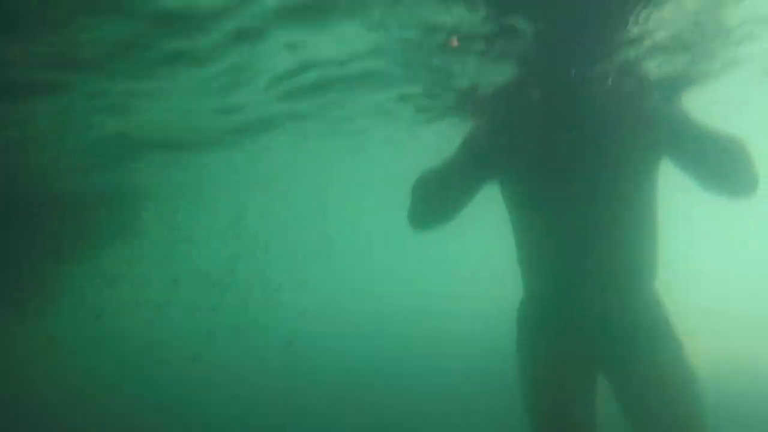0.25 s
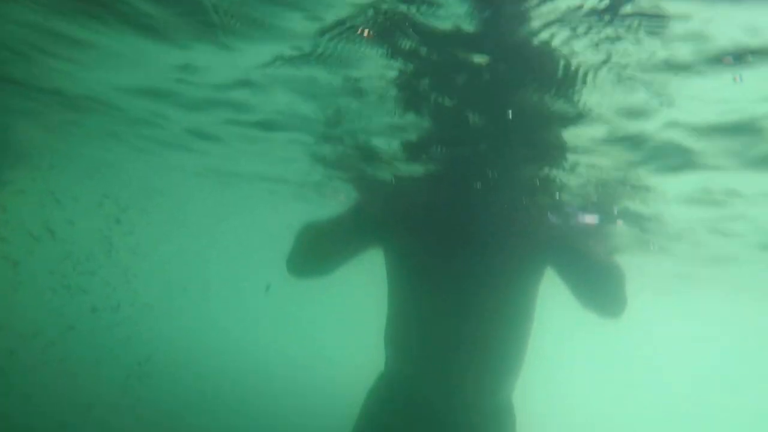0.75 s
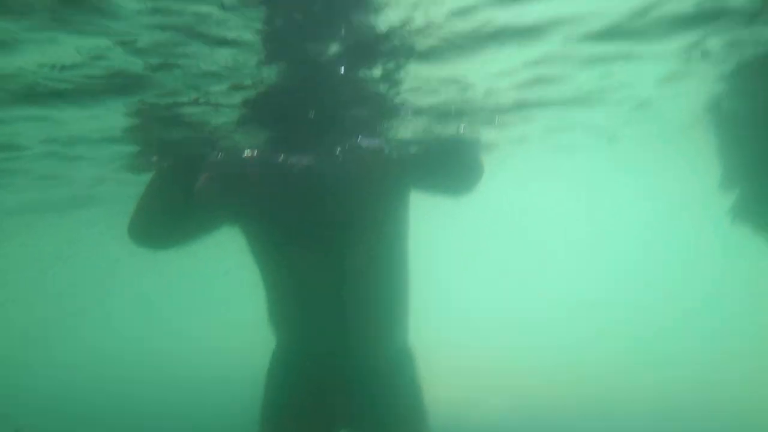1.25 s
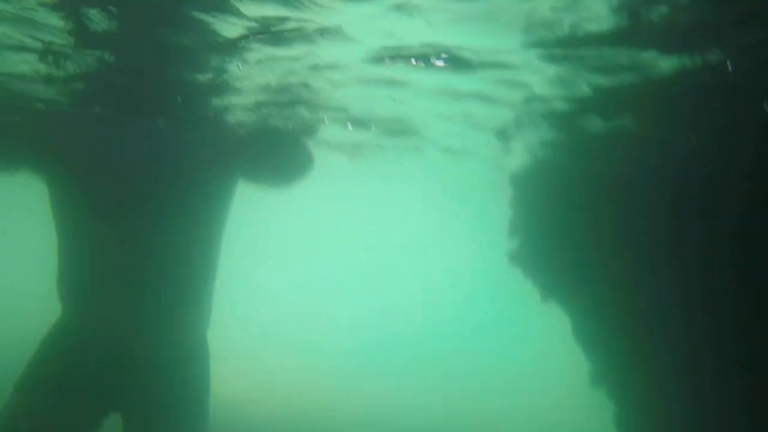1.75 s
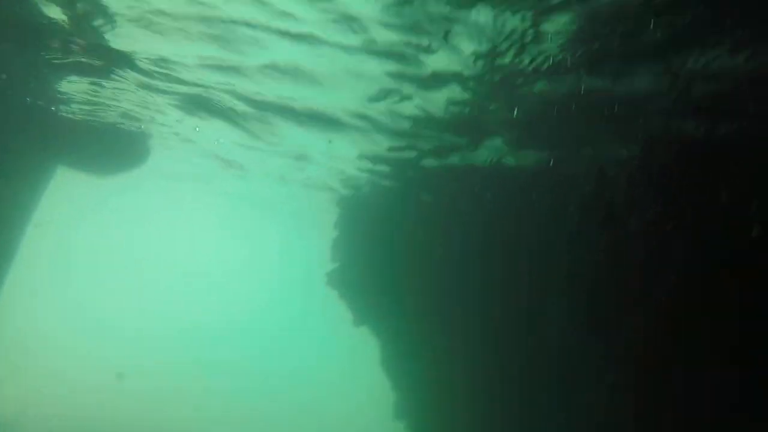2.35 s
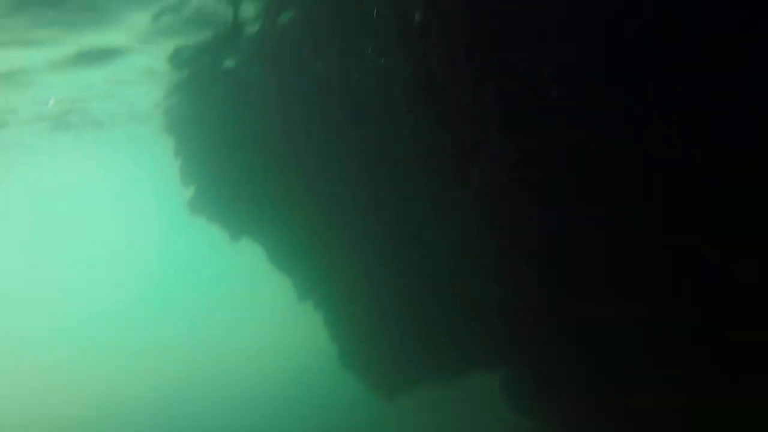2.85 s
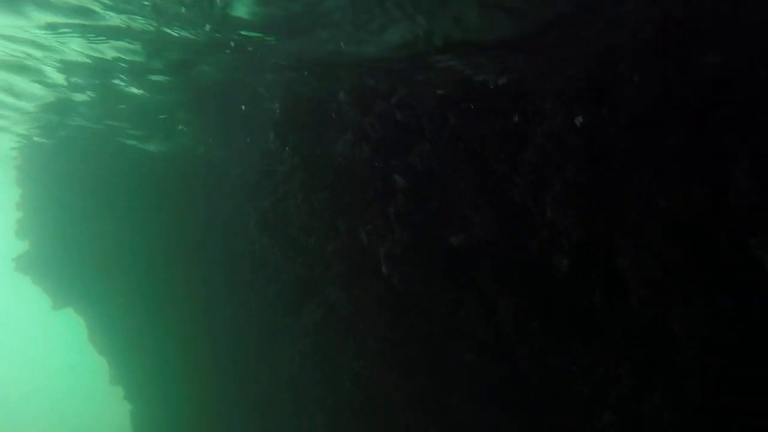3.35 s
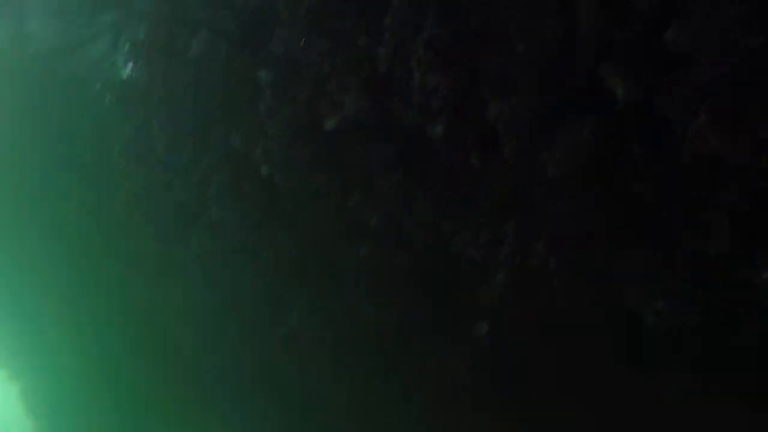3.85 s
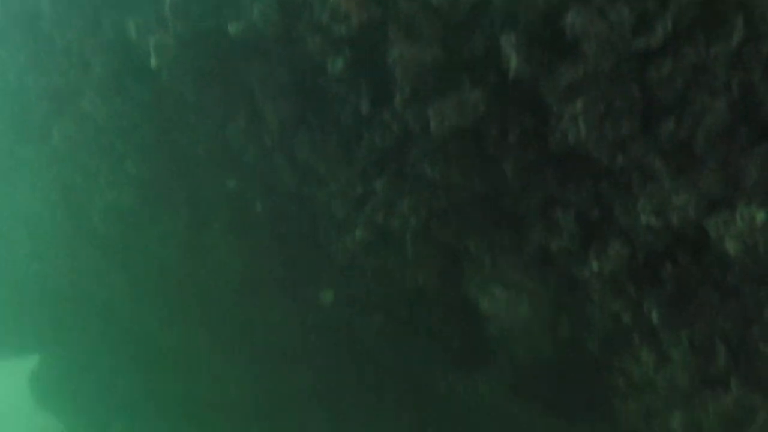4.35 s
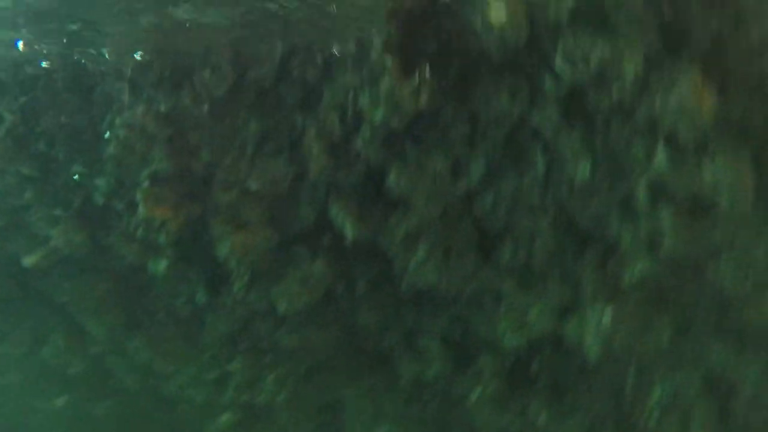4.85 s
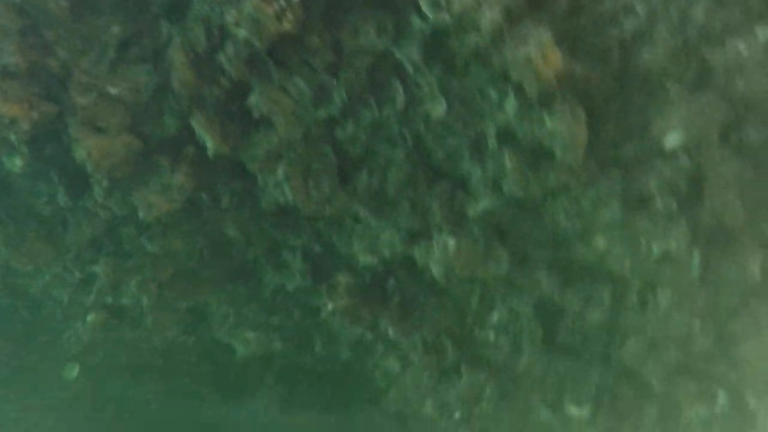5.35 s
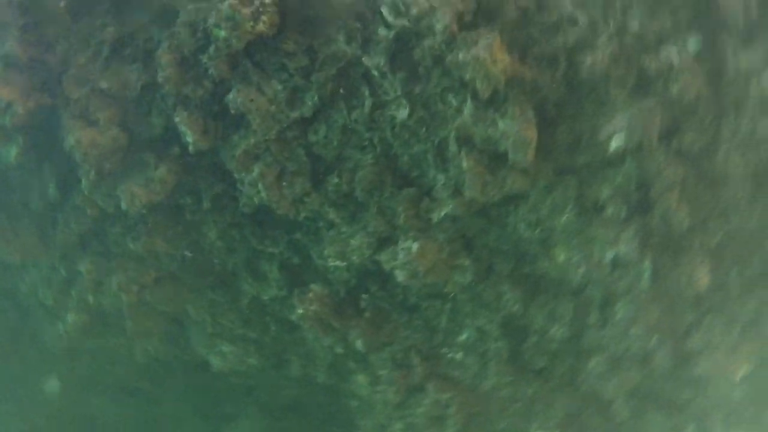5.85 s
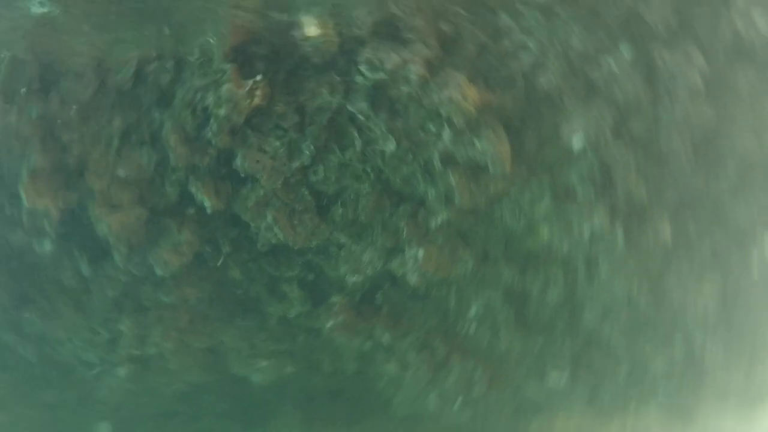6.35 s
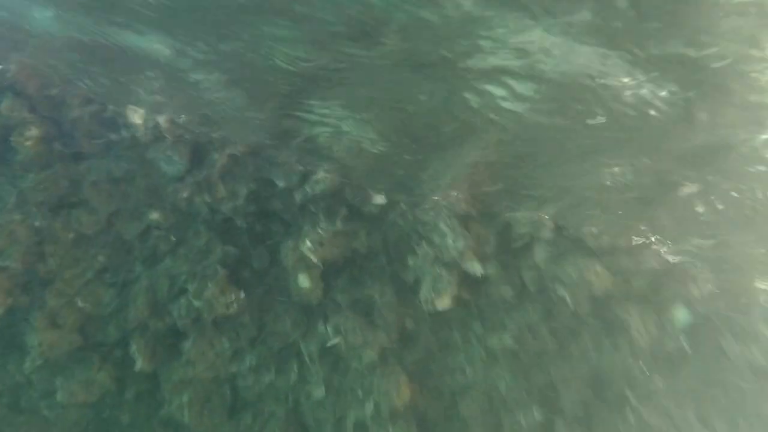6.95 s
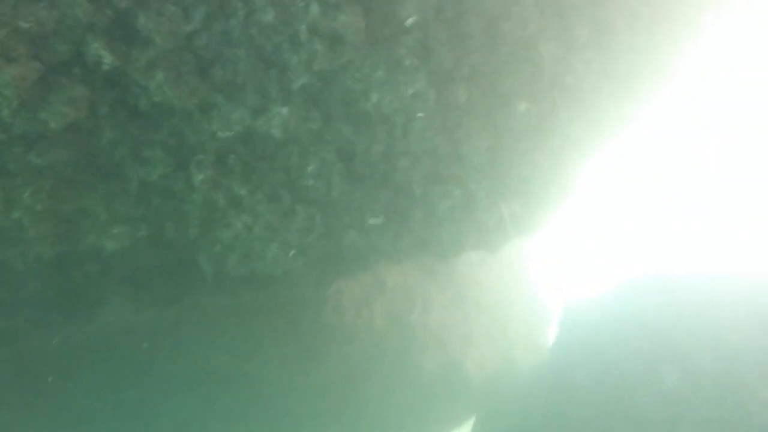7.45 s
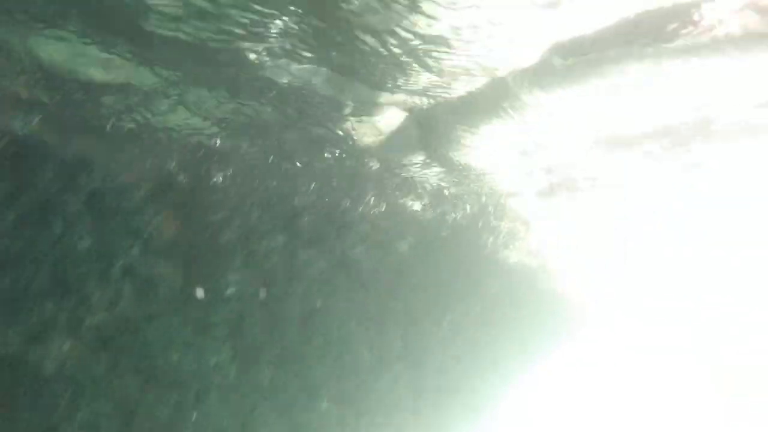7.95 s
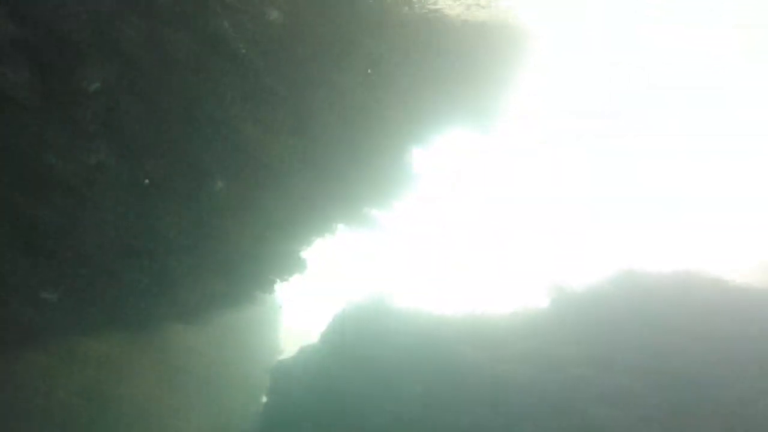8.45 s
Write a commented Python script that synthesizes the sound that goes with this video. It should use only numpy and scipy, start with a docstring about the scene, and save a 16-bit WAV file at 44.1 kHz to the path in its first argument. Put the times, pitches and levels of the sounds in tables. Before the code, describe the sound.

Under shallow sea water beside a rock, a soft steady wash surrounds the microphone. A boat engine hums on an almost constant low pitch near 200 Hz, faint and fluttering at first, with a small slosh and glug at the start and a few bubbles at 1.1-1.5 s. Around 1.6 s the thin sound gains bass. From 2.5 to 3.1 s a thick run of hollow bubbles gurgles with short low booms; one boom thumps near 3.4 s. Flow rumble rises from about 3 s, then eases. Tiny bright shrimp snaps tick throughout, sharpest near 4.0, 4.3 and 7.15 s, over faint crackle. Another slosh comes near 4.7 s. The engine strengthens clearly from 4.4 s, gaining buzzy overtones after 5.3 s. More round glugs come at 6.2-6.7 s. The drone peaks near 7 s, dips briefly around 7.5 s, then returns full and throbbing, with rumble and a last slosh until 8.7 s.

```python
"""A boat engine drones through shallow sea water and grows louder, heard under water beside a rock.
The engine is a set of sine orders locked to one shaft, each with its own level and waver.
Small waves slosh and gurgle as swarms of ringing bubbles over noise; booms are stirred low tones.
Snapping shrimp are short filtered noise bursts that tick against the microphone's housing.
Filtered noise gives the rumble of flow and the steady wash of distant water."""
import sys
import numpy as np
from scipy import signal
from scipy.fft import rfft, irfft
from scipy.io import wavfile
from scipy.ndimage import map_coordinates

SR = 44100
rng = np.random.default_rng(int(sys.argv[2]) if len(sys.argv) > 2 else 0)


def master(y):
    """Save y as 16-bit WAV."""
    cut = np.clip(np.atleast_2d(y).T, -1, 1)
    pcm = np.round(cut * 32767)  # scale
    wavfile.write(sys.argv[1], SR, pcm.astype(np.int16))


N = 384111
TIME = np.arange(N) / SR


def amp(db):
    """Decibels to gain."""
    return 10 ** (np.asarray(db) / 20)


def unit(x):
    """Scale to an rms of one."""
    return x / np.sqrt(np.mean(x ** 2) + 1e-20)


def curve(rows):
    """Second column of a table, interpolated over the times in the first."""
    rows = np.array(rows)
    return np.interp(TIME, rows[:, 0], rows[:, 1])


def colour(x, points):
    """Filter by a spectrum of (Hz, dB) points joined on a log-frequency axis."""
    hz, db = np.transpose(points)
    f = np.fft.rfftfreq(len(x), 1 / SR)
    gain = amp(np.interp(np.log(f + 1), np.log(hz), db))
    return irfft(rfft(x) * gain, len(x))


def drift(per_s):
    """Smooth random signal of unit rms, with per_s random knots a second."""
    knots = rng.standard_normal(4096)
    return unit(map_coordinates(knots, [TIME * per_s], order=2, mode="wrap"))


def add(mix, start_s, sound):
    """Mix a sound in, in place, from start_s."""
    part = mix[max(round(start_s * SR), 0):][:len(sound)]
    part += sound[:len(part)]


def sparse(per_s, spread_db):
    """Random impulses of either sign, most of them small and a few large."""
    size = amp(spread_db * np.minimum(rng.exponential(1, N), 4))
    sign = rng.choice([-1, 1], N)
    return size * sign * (rng.random(N) < per_s / SR)


def swell(crest_s, level_db, rise_s, fall_s):
    """Power of a surge that builds up to its crest and ebbs away, Gaussian on each side."""
    width_s = np.where(TIME < crest_s, rise_s, fall_s)
    return amp(level_db) ** 2 * np.exp(-((TIME - crest_s) / width_s) ** 2)


def engine(jitter_rad=0.046, throb_depth=0.2):
    """Engine orders, all locked to one shaft whose phase jitters slightly."""
    # firing rate: [time_s, rate_hz]
    speed = [(0, 105), (.7, 103.2), (1.3, 103.7), (2.1, 102.1), (2.65, 106.1), (3.4, 102.8), (3.8, 103.5),
             (4.3, 103.2), (4.75, 102.2), (5.3, 102.8), (5.8, 103.4), (6.3, 103.5), (6.8, 104.3),
             (7.25, 105), (8, 104.3), (8.3, 104.4), (8.71, 104.7)]
    # level of the firing note: [time_s, level_db]
    firing = [(0, -78), (1.5, -58), (2, -51.5), (3, -51), (5, -65), (5.8, -53.5), (7.25, -54.5),
              (7.55, -39), (8.15, -35), (8.4, -36.5), (8.71, -33.5)]
    # paths off bottom and surface add and cancel, so orders 3 and 4 fade on their own: [time_s, level_db]
    third = [(0, -64), (.5, -50), (1.35, -48.5), (1.95, -61), (2.5, -46.5), (3.1, -47), (4.25, -53.5),
             (5.65, -52.5), (7, -44.5), (7.75, -48.5), (8.71, -43)]
    fourth = [(0, -63), (5.3, -68), (5.85, -51.5), (6.7, -48), (7.6, -53.5), (8, -60), (8.45, -40.5),
              (8.71, -42.5)]
    # reference level of the other overtones as the boat nears: [time_s, level_db]
    nearness = [(0, -53.5), (4, -61.5), (5.4, -48.5), (5.95, -52), (6.5, -47.5), (7.1, -45), (7.5, -48.5),
                (8.2, -42.5), (8.71, -44.5)]
    # other overtones: [multiple of firing rate, db re final nearness, share of nearness swing, unrest 0-1]
    overtones = [(1.5, -9, 1.6, .36), (2.5, -27, 0.88, 0), (3.65, -11.5, 1.8, 1), (4.8, -4.5, 1, 0.42),
                 (5, -1, 1.66, 0.14), (5.5, -7, 1.7, .22)]

    phase = 2 * np.pi * np.cumsum(curve(speed)) / SR + jitter_rad * drift(16)
    out = drone(phase) + overtone(phase, curve(firing), unrest=0.076)
    out += overtone(3 * phase, curve(third), unrest=0.35)
    out += overtone(4 * phase, curve(fourth), unrest=0.1)

    near_db = curve(nearness)
    final_db = near_db[-1]
    # unequal cylinders: one swell in every four firings
    putter = 1 + throb_depth * np.cos(phase / 4)
    for order, db, share, unrest in overtones:
        level_db = db + final_db + share * (near_db - final_db)
        out += putter * overtone(order * phase, level_db, unrest)
    return np.sqrt(2) * out  # sine peak to rms


def drone(phase, flutter=0.1, beat_depth=0.34, beat_fade_s=3.2):
    """Strongest line, at twice the firing rate; its echo off the rocking surface beats while it is far."""
    # drone level before beat and flutter: [time_s, level_db]
    level = [(0, -43.5), (.9, -40.5), (2.25, -38), (2.6, -44.5), (3, -38.5), (3.25, -31.5), (4.05, -38.5),
             (4.4, -31), (5.3, -27), (5.68, -28.5), (5.77, -34), (5.92, -28), (7.05, -24), (7.45, -32),
             (8.08, -25), (8.71, -29)]
    # beats of the surface echo: [period_s, first_dip_s]
    beats = [(.228, .045), (.146, .062)]
    depth = beat_depth * np.exp(-(TIME / beat_fade_s) ** 2)
    beat = 1 - depth * sum(np.cos(2 * np.pi * (TIME - dip_s) / period_s) for period_s, dip_s in beats)
    return amp(curve(level)) * beat * (1 + flutter * drift(30)) * np.sin(2 * phase)


def overtone(phase, level_db, unrest):
    """One engine line, its amplitude and phase wavering under the moving surface."""
    waver = 1 + unrest * (drift(20) + 1j * drift(20))
    start_rad = 2 * np.pi * rng.random()
    return amp(level_db) * (waver * np.exp(1j * (phase + start_rad))).real


def boom(centre_hz=160, stir_per_s=34, trim_db=-4.5, rest_db=-45):
    """Broad low resonance: a tone stirred at random, swelling as water is pushed into the rock's cavities."""
    # hollow booms in the cavities: [crest_s, level_db before trim_db, rise and fall_s]
    booms = [(1.25, -41, .2), (1.74, -33, 0.11), (2.28, -32, 0.06), (2.56, -34, 0.032), (2.84, -34.5, .05),
             (3.357, -27.5, 0.03), (4.773, -37, 0.23), (5.55, -38, 0.39), (6.59, -29.5, 0.051),
             (7.416, -35.5, 0.055), (8.3, -35.5, .15)]
    stir = drift(stir_per_s) + 1j * drift(stir_per_s)
    stir /= np.sqrt(1.0 + abs(stir) ** 2)  # soft limit
    tone = unit((stir * np.exp(2j * np.pi * centre_hz * TIME)).real)
    power = amp(rest_db) ** 2 + sum(swell(s, db, length_s, length_s) for s, db, length_s in booms)
    return amp(trim_db) * np.sqrt(power) * tone


def waves(trim_db=3.5, unrest_db=1.55, ripple_db=-49):
    """Swarms of small bubbles over a noise churn, swelling with each wave, plus flow rumble at the housing."""
    # waves lapping at the rock: [crest_s, level_db before trim_db, rise_s, fall_s]
    lapping = [(.04, -44, 0.052, 0.069), (1.14, -48, 0.054, 0.037), (1.48, -45.5, 0.057, 0.11),
               (2.66, -40.5, 0.28, 0.45), (3.46, -45.5, 0.037, 0.32), (4.76, -39.5, 0.24, 0.2),
               (6.52, -38, .2, 0.32), (8.45, -42, 0.29, 0.38)]
    # slosh filter: [freq_hz, gain_db]
    slosh_spectrum = [(60, -46), (130, -3.5), (230, -2), (290, -7.5), (400, -9), (500, 3), (590, -5.5),
                      (700, -6.5), (900, -13), (1400, -15.5), (3000, -77)]
    # rumble filter: [freq_hz, gain_db]
    rumble_spectrum = [(8, -22), (25, 2.5), (70, 5), (110, 1), (170, 3.5), (400, -57)]
    # flow round the housing as it is moved: [time_s, level_db before a 1.1 dB lift]
    flow = [(0, -64), (1.45, -67), (1.8, -52), (2.7, -54), (3.05, -40.5), (3.7, -44), (3.95, -53),
            (5.2, -63), (6, -53.5), (7.2, -53), (7.8, -44.5), (8.71, -44)]

    pitches_hz = np.geomspace(150, 1300, 24)
    swarm = sum(signal.oaconvolve(sparse(16, 1.3), bubble(hz, 18 / hz))[:N] for hz in pitches_hz)
    churn = unit(swarm) + 0.5 * rng.standard_normal(N)
    power = amp(ripple_db) ** 2 + sum(swell(*wave) for wave in lapping)  # ripple: slosh between waves
    level = amp(trim_db + unrest_db * drift(9)) * np.sqrt(power)
    slosh = level * unit(colour(churn, slosh_spectrum))
    rumble = amp(curve(flow) + 1.1) * unit(colour(rng.standard_normal(N), rumble_spectrum))
    return slosh + rumble


def bubble(hz, t60_s, rise=0.12, attack=0.032):
    """An air pocket swells and rings, rising through its pitch as it nears the surface."""
    life = np.arange(SR // 8) / SR / max(t60_s, .005)  # age in ring times; attack is in the same unit
    pitch_hz = hz * (1 + rise * (np.minimum(life, 1) - .15))
    ring = np.sin(2 * np.pi * np.cumsum(pitch_hz) / SR)
    ring *= (1 - np.exp(-life / attack)) ** 2 * np.exp(-np.log(1000) * life)
    return ring / abs(ring).max()


def glugs(push_db=-10, push_hz=220):
    """Large air pockets pinched off by the waves; each starts with a short, low push of water."""
    # large bubbles: [start_s, peak_db before push and a 1.5 dB cut, pitch_hz, t60_s]
    pockets = [(0.037, -27, 556, 0.051), (.158, -37, 486, .085), (1.13, -34, 657, .035),
               (1.151, -26.5, 320, .03), (1.297, -29, 590, 0.042), (1.31, -30, 433, 0.053),
               (1.478, -30, 565, 0.047), (2.513, -37, 850, .015), (2.522, -27, 295, 0.07),
               (2.551, -21, 470, 0.045), (2.554, -29, 890, .015), (2.569, -32, 1170, 0.021),
               (2.6, -25.5, 472, .045), (2.639, -24.5, 430, 0.051), (2.654, -22, 504, 0.06),
               (2.663, -15.5, 510, 0.038), (2.689, -34, 932, 0.048), (2.724, -28.5, 456, .045),
               (2.727, -33.5, 750, 0.05), (2.76, -20, 542, 0.033), (2.795, -32, 540, .075),
               (2.809, -29.5, 760, .04), (2.87, -22.5, 460, 0.045), (2.896, -26.5, 493, 0.027),
               (2.954, -31, 444, 0.026), (2.978, -25.5, 457, 0.042), (3.009, -25, 547, 0.018),
               (3.052, -28, 444, .12), (3.135, -28.5, 585, 0.037), (3.136, -30, 260.8, 0.049),
               (3.421, -28.5, 490, .04), (3.445, -28, 456, 0.038), (3.581, -28.5, 310, .07),
               (4.423, -38.5, 805, 0.081), (4.63, -30, 495, 0.098), (4.709, -30, 803, .025),
               (4.745, -30.5, 437, .05), (4.758, -29.5, 870, 0.033), (4.912, -25.5, 337, 0.037),
               (5.363, -32.5, 1805, .008), (5.3635, -30, 1050, 0.0079), (6.242, -29, 588, 0.048),
               (6.352, -25, 475.4, 0.23), (6.389, -31, 499, 0.071), (6.509, -23, 290, .035),
               (6.514, -21, 558, 0.032), (6.559, -24, 732, 0.0092), (6.643, -29, 517, .05),
               (6.66, -22, 500, 0.054), (6.731, -30, 500, 0.025)]
    out = np.zeros(N)
    for start_s, db, hz, t60_s in pockets:
        push = amp(push_db) * bubble(push_hz, 0.014)
        add(out, start_s, amp(db - 1.5) * (bubble(hz, t60_s) + push))
    return out


def shrimp():
    """A few near snaps, scattered ticks farther off, and the fine crackle of the far colony."""
    # near snaps: [time_s, peak_db before a 1.1 dB cut, brightest_hz, knock_db re snap before a 2 dB lift]
    snaps = [(.2638, -32, 10900, -22), (.3737, -26.5, 4880, -15), (0.596, -32.5, 9450, -21),
             (0.8033, -33.5, 6460, -9), (1.566, -36.5, 6110, -6), (1.6707, -30, 10400, -24),
             (1.7843, -30, 6850, -22), (1.799, -29, 4150, -4), (2.012, -25.5, 7040, -29),
             (2.164, -31.5, 9050, -9), (2.6389, -30.5, 7800, -23), (2.717, -29.5, 7300, -11),
             (3.06, -29, 8500, -14), (3.27, -39, 3930, 1.5), (3.92, -30, 6300, -23),
             (3.9487, -27.5, 8260, -28), (4.0254, -21, 6696, -20), (4.0856, -29.5, 7380, -17),
             (4.3316, -23, 7100, -23), (4.6228, -37, 8950, -19), (4.821, -31, 8020, -28),
             (5.005, -37.5, 9060, -6.5), (5.44, -33.5, 6900, -16), (5.6301, -39, 8800, -17),
             (6.439, -33, 8200, -24), (6.6734, -28, 4570, -1.5), (7.1422, -35, 5500, -24),
             (7.1522, -29.5, 13000, -0.5), (7.1532, -23.5, 5865, -25), (7.892, -38, 8130, -13),
             (7.962, -36.5, 7000, -12), (8.3682, -30, 10800, -21), (8.3864, -29.5, 5040, -11)]
    # crackle of the colony: [time_s, level_db]
    colony = [(0, -61), (.6, -87), (2.8, -65), (3.6, -78), (4.1, -67), (5.1, -70.5), (7.05, -68.5),
              (7.3, -63.5), (7.7, -69), (8.71, -66)]

    near = np.zeros(N)
    for time_s, db, hz, knock_db in snaps:
        sound = snap(hz) + amp(knock_db + 2.0) * knock()
        add(near, time_s - .0065, amp(db - 1.1) * sound)  # bursts centre 8 ms into their buffer
    tick_hz = np.geomspace(6200, 10500, 12)
    ticks = sum(signal.oaconvolve(sparse(4, 1.9), snap(hz, focus_db=28))[:N] for hz in tick_hz)
    crackle_hz = np.geomspace(4000, 10000, 10)
    crackle = sum(signal.oaconvolve(sparse(70, 2.7), snap(hz))[:N] for hz in crackle_hz)
    far = amp(-66.5) * unit(ticks) + amp(curve(colony)) * unit(crackle)
    return near + amp(-14) * scatter(near) + far


def snap(hz, bounce=0.13, focus_db=15, ring_s=0.00088, echo_db=-26):
    """A claw's crack: noise smeared by short paths off rock and surface and coloured by the housing."""
    # response of the housing: [freq_hz, gain_db]
    housing = [(800, -48), (2000, -20), (3300, 0), (4000, -2), (5200, -6), (6050, 2.5), (7000, -8),
               (8000, -6), (8950, -2.5), (10600, -8), (12500, -7), (14000, -10.5), (15500, -47)]
    t = np.arange(1024) / SR - .008
    envelope = np.exp(-abs(t) / ring_s) + amp(echo_db) * np.exp(-abs(t) / 0.011)
    crack = rng.standard_normal(len(t)) * envelope
    crack = crack + bounce * np.roll(crack, round(SR / hz))  # a close second path combs the spectrum
    focus = [(hz / 2, -focus_db), (hz, 0), (hz * 2, -focus_db)]
    crack = colour(colour(crack, housing), focus)
    return crack / abs(crack).max()


def knock():
    """The low part of a close snap: a noise burst weighted to about 1 kHz."""
    t = np.arange(1024) / SR - .008
    thud = rng.standard_normal(len(t)) * np.exp(-abs(t) / 0.0019)
    thud = colour(thud, [(400, -27), (1000, -1.5), (1800, -8.5), (2800, -12.5), (5000, -17.5), (12000, -67)])
    return thud / abs(thud).max()


def scatter(x, t60_s=0.23):
    """Diffuse tail off the rough rock: the energy of each snap dies away as fizz."""
    # sound scattered back by the rock: [freq_hz, gain_db]
    spectrum = [(3500, -32), (5200, -4), (6100, -2), (7300, -4), (9000, -22), (10500, -14), (14000, -31)]
    keep = np.exp(-2 * np.log(1000) / (t60_s * SR))
    energy = signal.lfilter([1 - keep], [1, -keep], x ** 2)
    return np.sqrt(energy) * unit(colour(rng.standard_normal(N), spectrum))


def sea():
    """The steady wash of distant water: filtered noise, its level drifting slightly."""
    # wash filter: [freq_hz, gain_db]
    spectrum = [(20, -21), (200, 8.5), (500, 3.5), (700, 1), (1020, -3.5), (1860, -8), (2550, -13),
                (3200, -21), (4500, -18), (5400, -24), (6200, -20.5), (7700, -24.5), (9200, -22),
                (13200, -33), (16000, -41)]
    return amp(-46.0 + 0.28 * drift(14)) * unit(colour(rng.standard_normal(N), spectrum))


def scene():
    """Everything meets at one microphone under water."""
    return (engine() + boom() + waves() + glugs() + sea() + shrimp())[None]


def record(dry, low_cut_hz=138, floor_db=-15, edge_hz=15400):
    """A steep low cut holds the bass back at first and then opens; last, the band limit."""
    f = np.fft.rfftfreq(2 * N, 1 / SR)
    low_cut = np.maximum(np.minimum(f / low_cut_hz, 1) ** 12, amp(floor_db))
    thin = irfft(rfft(dry, 2 * N) * low_cut)[:, :N]
    opened = np.clip((TIME - 1.56) / 0.14, 0, 1)  # opens from 1.56 s, over 0.14 s
    mix = thin + opened * (dry - thin)
    band_limit = signal.firwin(511, edge_hz, window=("kaiser", 9), fs=SR)
    return signal.oaconvolve(mix, band_limit[None], "same")


dry = scene()
out = record(dry)
master(out)
```